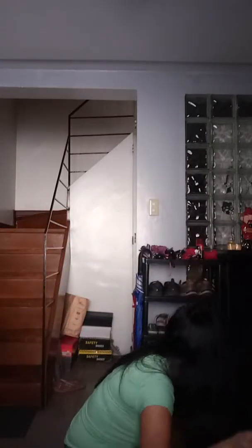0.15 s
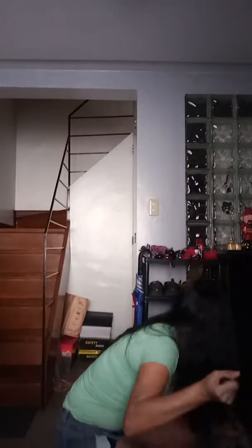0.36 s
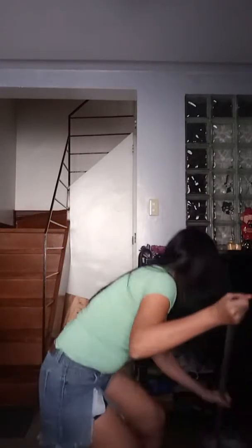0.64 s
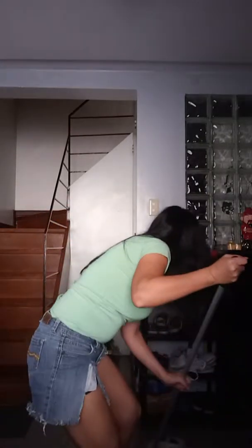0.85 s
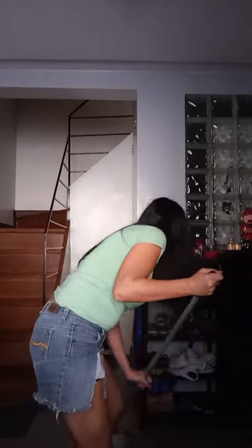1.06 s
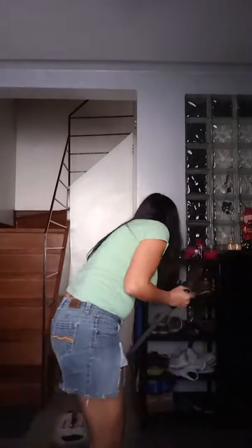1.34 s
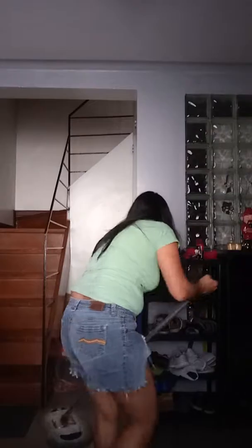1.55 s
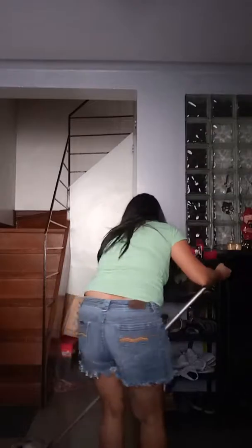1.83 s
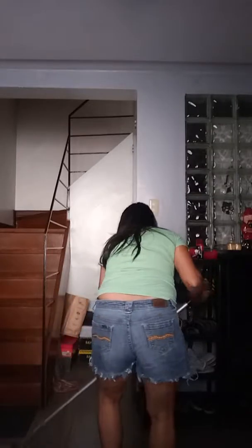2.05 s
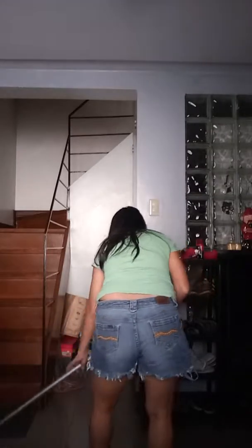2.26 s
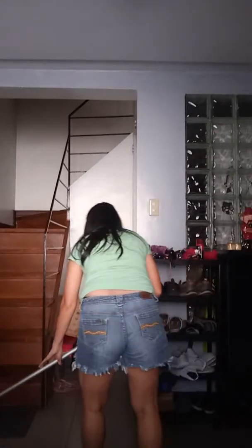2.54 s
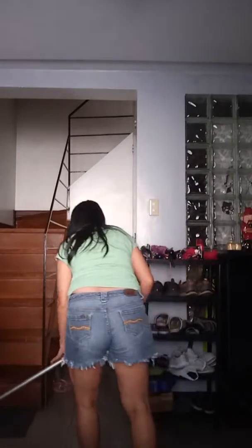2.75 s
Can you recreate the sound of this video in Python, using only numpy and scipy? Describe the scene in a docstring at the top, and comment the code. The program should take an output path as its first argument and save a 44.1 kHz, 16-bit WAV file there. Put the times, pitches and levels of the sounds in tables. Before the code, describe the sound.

A damp mop works a hard floor in a bare, echoing hallway. A clack and dull bumps open at 0-0.15 s; a squeaky scrub and clacks follow around 0.4-0.55 s, then a sharp, screechy clack near 0.87 s. A clack at 1.36 s leads to a shrill handle squeal at 1.52 s. Clacks and a stroke run 1.75-2.05 s; after a lull, bumps, squeaks and clacks crowd 2.6-2.9 s over faint hum.

```python
"""A damp mop is pushed quickly to and fro over a hard floor in a bare, echoing hallway, over a faint hum.
A clack and dull bumps of the steps come first, then squeaks, scrubbing strokes and clacks at the turns.
Halfway through the sliding handle squeals; more clacks, strokes, bumps and squeaks crowd the last moments.
Friction noise drives clacks, strokes and rubs, low noise the bumps; wavering sines make squeaks and squeal."""
import sys
import numpy as np
from scipy import signal
from scipy.fft import rfft, irfft
from scipy.io import wavfile

SR = 44100
rng = np.random.default_rng(int(sys.argv[2]) if len(sys.argv) > 2 else 0)


def bounce(signal):
    """Save signal as a 16-bit WAV file at the path given by the first command-line argument."""
    frames = np.transpose(np.atleast_2d(signal))
    limited = np.clip(frames, -1, 1)
    pcm = np.round(limited * 32767).astype(np.int16)
    wavfile.write(sys.argv[1], SR, pcm)


N = 127890  # samples, 2.9 s
TOP_HZ = 15800  # upper limit of the microphone
ROOM_DB, SQUEAK_ROOM_DB = 1.5, -2.5  # echo gain for contacts and for squeaks


def undb(db):
    """Decibels to gain."""
    return 10 ** (np.asarray(db) / 20)


def unit(x):
    """Scale to rms 1."""
    return x / np.sqrt(np.mean(x ** 2) + 1e-20)


def along(points, hz):
    """Read (Hz, value) points on a log-frequency axis."""
    p = np.array(points, float)
    return np.interp(np.log(np.maximum(hz, 1)), np.log(p[:, 0]), p[:, 1])


def colour(x, points):
    """Causal, minimum-phase filter with the given (Hz, dB) response."""
    size = 2048
    gain = undb(along(points, np.fft.rfftfreq(size, 1 / SR)))
    cepstrum = irfft(np.log(gain))
    # folding the cepstrum forward in time makes the filter causal
    cepstrum[1:size // 2] *= 2
    cepstrum[size // 2 + 1:] = 0
    impulse_response = irfft(np.exp(rfft(cepstrum)))
    return signal.fftconvolve(x, impulse_response)[:len(x)]


def wander(hz):
    """Random line with hz new values a second, joined straight; spread a little under 1."""
    return np.interp(np.arange(N) / SR * hz, np.arange(N), rng.standard_normal(N))


def envelope(start, attack, hold, fade):
    """Squared rise, hold and exponential fade (all in seconds)."""
    t = np.arange(N) / SR - start
    rise = np.clip(t / attack, 0, 1) ** 2
    return rise * np.exp(-np.maximum(t - attack - hold, 0) / fade)


def background():
    """The hush of the house, slowly drifting coloured noise, with a faint low hum."""
    # tone of the hush: f/Hz, level/dB (relative)
    hush_tone = [(15, -29), (25, -0.5), (104, -2.5), (188, 4), (209, -1), (260, 5.5), (410, -2.5), (537, 4),
                 (804, -0.5), (945, 3.5), (1270, 1.5), (1850, 0), (3170, -3), (7500, -6.5), (15500, -17.5)]
    hush_db, hum_db, hum_hz = -52, -70.5, 102.8
    hush = unit(colour(rng.standard_normal(N), hush_tone))
    hum = np.sqrt(2) * np.sin(2 * np.pi * hum_hz * np.cumsum(1 + 0.005 * wander(16)) / SR)
    return undb(hush_db + 0.23 * wander(6.88)) * hush + undb(hum_db) * hum


def hallway(x):
    """Diffuse echo of hard walls: noise that fades at its own pace in each band, evened across pitch."""
    # decay by band, before the evening-out: f/Hz, t60/s
    room_decay = [(200, 0.58), (800, 0.36), (2000, 0.43), (6000, 0.38), (11000, 0.3), (15000, 0.35)]
    build_s, evenness = 0.0028, 0.75  # evenness 1 would flatten the spectrum fully
    t, hz = np.arange(SR) / SR, np.fft.rfftfreq(SR, 1 / SR)
    build = 1 - np.exp(-t / build_s)
    noise, tail = rfft(rng.standard_normal(SR)), 0
    for k, (_, t60) in enumerate(room_decay):
        # each band overlaps its neighbours as a triangle
        share = along([(f, j == k) for j, (f, _) in enumerate(room_decay)], hz)
        tail = tail + irfft(noise * share, SR) * np.exp(-np.log(1000) * t / t60)
    response = rfft(tail * build, 2 * SR)
    tail = irfft(response / np.abs(response) ** evenness)[:SR] * build
    return signal.fftconvolve(x, tail / np.sqrt(np.sum(tail ** 2)))[:N]


def heard(x, room_db):
    """Direct sound plus a freshly drawn echo of the hallway."""
    return x + undb(room_db) * hallway(x)


def bumps():
    """Dull knocks of feet and mop on the floor: bursts of low noise with a soft 3 ms onset."""
    # knocks: t/s, level/dB, fade/s
    knocks = [(0.0, -41, 0.014), (0.047, -28, 0.0065), (0.092, -37.5, 0.008), (0.682, -44, 0.022),
              (0.923, -50.5, 0.075), (2.619, -31.5, 0.012), (2.812, -42.5, 0.03), (2.856, -31, 0.048)]
    # tone of the knocks: f/Hz, level/dB (relative)
    knock_tone = [(60, -25), (140, -11.5), (230, -2), (320, 6.5), (450, 0), (800, -3), (1600, -10),
                  (3000, -25), (12000, -35)]
    force = sum(undb(db) * envelope(s, 0.003, 0, fade) for s, db, fade in knocks)
    return force * unit(colour(rng.standard_normal(N), knock_tone))


def friction():
    """Tiny slips, random clicks of either sign, over the hiss of fibres."""
    slips_per_s, spread_db, fibre_db = 600, 4, -5.5  # fibres relative to slips
    slipping = rng.random(N) < slips_per_s / SR
    strength = undb(spread_db * np.minimum(rng.exponential(size=N), 3))
    slips = slipping * rng.choice([-1, 1], N) * strength
    return unit(unit(slips) + undb(fibre_db) * rng.standard_normal(N))


def resonant_rubs():
    """Rubs, a rough screech and hollow body tones: friction noise through narrow resonances, some overlapping."""
    # resonant sounds: t/s of peak, level/dB, swell/s, fade/s, centre f/Hz, width/Hz of each filter pass
    resonances = [(0.43, -47, 0.051, 0.048, 566, 132), (0.43, -39, 0.059, 0.023, 910, 172),
                  (0.698, -44, 0.06, 0.016, 863, 120), (0.744, -44.5, 0.18, 0.015, 1650, 302),
                  (0.869, -18.5, 0.005, 0.012, 6205, 343), (1.03, -51.5, 0.095, 0.24, 1550, 306),
                  (1.275, -55, 0.074, 0.034, 4030, 800), (1.37, -30, 0.017, 0.0067, 690, 201),
                  (1.55, -47.5, 0.044, 0.036, 2550, 1100), (1.60, -48, .05, 0.093, 1460, 650),
                  (1.766, -29, .012, 0.027, 3700, 700), (2.58, -52.5, 0.062, 0.023, 3100, 700)]
    drive, out = friction(), np.zeros(N)
    for s, db, swell, fade, hz, width in resonances:
        b, a = signal.iirpeak(hz, hz / width, fs=SR)
        resonance = signal.lfilter(b, a, signal.lfilter(b, a, drive))
        out += undb(db) * unit(resonance) * envelope(s - swell, swell, 0, fade)
    return out


def squeaks():
    """Stick-slip tones that glide a little, with uneven cycles and up to two overtones."""
    # squeaks: t/s, length/s, start f/Hz, end f/Hz, level/dB, step/dB per overtone, roughness 0-1
    squeak_table = [(0.381, 0.0366, 812, 852, -32, -10, 0), (0.410, 0.067, 899.4, 931, -37.5, -6, 0.84),
                    (0.687, 0.049, 295.5, 266, -48.5, -8, 0), (0.852, 0.026, 3127, 3054, -39.5, 1.5, 0),
                    (0.861, 0.011, 6120, 6220, -22, -11, 0.65), (0.907, 0.049, 2056, 2092, -37, -20, 0),
                    (1.319, 0.04, 5000, 5020, -45, -14, 0.2), (1.981, 0.016, 1510, 1620, -36.5, -17, 0.1),
                    (2.632, 0.044, 5060, 5123, -39, -11.5, 0.22), (2.748, 0.021, 5050, 5100, -48, -5, .08),
                    (2.752, 0.054, 11350, 11330, -16.5, -30, 0.29),
                    (2.882, 0.026, 6080, 6020, -29, -13, 0.2)]
    edge_s, jitter_depth = 0.0066, 0.021  # depth as a share of pitch at full roughness
    t, out = np.arange(N) / SR, np.zeros(N)
    jitter, grip = wander(350), undb(1.8 * wander(120))
    for s, length, start_hz, end_hz, db, step_db, rough in squeak_table:
        on = (t >= s) & (t < s + length)
        u = t[on] - s
        glide = start_hz + (end_hz - start_hz) * u / length
        phase = 2 * np.pi * np.cumsum(glide * (1 + jitter_depth * rough * jitter[on])) / SR
        gate = np.sin(np.pi / 2 * np.clip(np.minimum(u, length - u) / edge_s, 0, 1)) ** 2
        tone = sum(undb(db + k * step_db) * np.sin((k + 1) * phase)
                   for k in range(3) if (k + 1) * start_hz < TOP_HZ)
        out[on] += gate * grip[on] * tone
    return out * np.sqrt(2)


def squeal():
    """A shrill squeal of the sliding handle: evenly spaced partials that waver together."""
    # partials: f/Hz, level/dB (relative)
    partials = [(6130, -21), (8600, -2), (11080, 0), (13600, -27)]
    start_s, swell_s, hold_s, fade_s = 1.522, 0.012, 0.05, 0.024
    level_db, wobble = -19.5, 0.007
    clock = np.cumsum(1 + wobble * wander(400)) / SR
    tone = sum(undb(db) * np.sin(2 * np.pi * hz * clock) for hz, db in partials)
    level = undb(level_db + 2 * wander(90))
    return level * unit(tone) * envelope(start_s, swell_s, hold_s, fade_s)


def contact(x, bass_db, middle_db, top_db):
    """Each contact has its own balance of tone around the treble."""
    # centres of bass, middle, treble and top: f/Hz
    tone_centres = [620, 1700, 4800, 12000]
    balance = list(zip(tone_centres, [bass_db, middle_db, 0, top_db]))
    first, last = np.flatnonzero(np.abs(x) > 1e-3)[[0, -1]]  # leave out the faintest ends
    out = np.zeros(N)
    out[first:last] = colour(x[first:last], balance)
    return out


def mop_body(x):
    """Broad colour of the mop head plus short ringing modes of head and handle."""
    # colour of the head: f/Hz, level/dB (relative)
    head_tone = [(80, -60), (170, -33.5), (312, -19), (400, -21), (541, -15), (660, -10), (1120, -9),
                 (1600, -5), (1950, -4.5), (2540, -11), (3660, -3), (4670, -1), (5270, -5), (6460, 1.5),
                 (9000, -4), (11500, -11.5), (13600, -14.5), (15000, -11)]
    # ringing modes: f/Hz, t60/s, level/dB (relative to the head)
    modes = [(690, 0.16, -31), (919, 0.21, -27), (1809, 0.27, -24), (3796, 0.039, -26.5),
             (4670, 0.027, -37.5), (6750, 0.074, -26.5), (7440, 0.028, -23)]
    t = np.arange(SR // 4) / SR
    ring = unit(colour(1. * (t == 0), head_tone))
    for hz, t60, db in modes:
        mode = np.sin(2 * np.pi * hz * t) * np.exp(-np.log(1000) * t / t60)
        ring = ring + undb(db) * unit(mode)
    return signal.fftconvolve(x, ring / np.sqrt(np.sum(ring ** 2)))[:N]


def mop():
    """Friction shaped by force: clacks rise with a crack and rattle out; strokes swell and fade."""
    # clacks of the head: t/s, level/dB, attack/s, fade/s, bass/dB, middle/dB, top/dB
    clacks = [(0.000, -24, 0.00067, 0.018, 2.5, 6.5, -5.5), (0.125, -20.5, 0.013, 0.0098, 1.5, 2, -17.5),
              (0.474, -20.5, 0.0073, 0.0038, -23.5, -9, -6.5), (0.565, -31.5, 0.0062, 0.011, 1, 9, -12),
              (0.861, -23, .008, 0.0083, -5, 2, 7), (0.91, -29, 0.0042, 0.023, 0.5, 5, 1),
              (1.357, -18.5, 0.0098, 0.023, 4, -1, 2.5), (1.656, -46.5, 0.0024, 0.021, 22, 11.5, 6),
              (1.751, -17, 0.012, 0.016, -1.5, -6, -1.5), (1.832, -22.5, .007, 0.029, 2.5, 4.5, -0.5),
              (2.002, -19.5, 0.0016, 0.016, 5.5, 4.5, 7.5), (2.603, -31.5, 0.012, 0.019, 15, 11, -18),
              (2.775, -34.5, 0.0028, 0.075, -4, 13.5, -6), (2.805, -18.5, 0.0085, 0.041, 2, 0, -4.5)]
    # scrubbing strokes: t/s of peak, level/dB, swell/s, fade/s, bass/dB, middle/dB, top/dB
    strokes = [(0.434, -24.5, 0.076, 0.034, -9, -4.5, -5), (0.735, -55, 0.11, 0.073, 23, 13.5, 6),
               (1.32, -50, 0.064, 0.1, 11, 2.5, 2), (2.053, -21, 0.018, 0.014, 1, -7.5, -5),
               (2.38, -63, 0.14, 0.15, 16, -13, 19.5), (2.705, -48, 0.027, 0.023, 16, 9, 8),
               (2.885, -25.5, 0.037, 0.036, 0, -12, -14)]
    crack_s, crack_db = 0.00076, -3.5  # crack relative to its clack
    rub, out = friction(), np.zeros(N)
    for s, db, attack, fade, bass, middle, top in clacks:
        crack = undb(crack_db) * envelope(s + attack / 2, crack_s / 2, 0, crack_s)
        force = envelope(s, attack, 0, fade) + crack
        out += undb(db) * contact(rub * force, bass, middle, top)
    for s, db, swell, fade, bass, middle, top in strokes:
        # the root makes the swell linear and doubles the halved fade
        force = np.sqrt(envelope(s - swell, swell, 0, fade / 2))
        out += undb(db) * contact(rub * force, bass, middle, top)
    return mop_body(out)


def smooth_mop(count):
    """The clacks and strokes from count contact points on the mop head, each with its own friction noise and
    echo, summed at even power for a smoother tone."""
    passes = sum(heard(mop(), ROOM_DB) for _ in range(count))
    return passes / np.sqrt(count)  # the root keeps the level of a single contact point


def scene():
    """Mop, bumps, rubs and squeaks in the hallway, over the hush of the house."""
    knocks_and_rubs = heard(bumps() + resonant_rubs(), ROOM_DB)
    shrill = heard(squeaks() + squeal(), SQUEAK_ROOM_DB)
    return (background() + knocks_and_rubs + shrill + smooth_mop(count=2))[None]


def record(dry):
    """The phone's microphone cuts the top steeply."""
    top_cut = signal.ellip(10, .2, 80, TOP_HZ, fs=SR, output="sos")
    return signal.sosfilt(top_cut, dry)


dry = scene()
out = record(dry)
bounce(out)
```